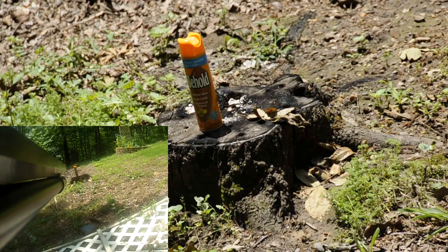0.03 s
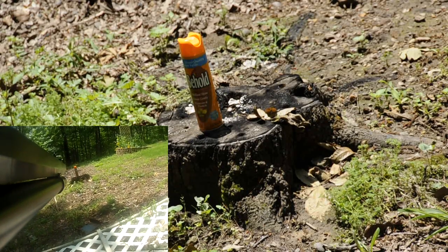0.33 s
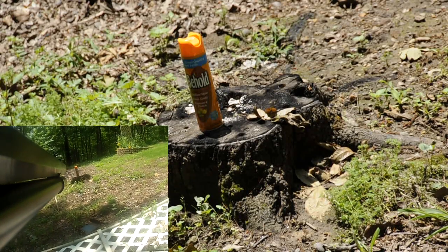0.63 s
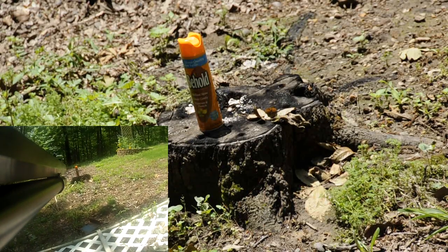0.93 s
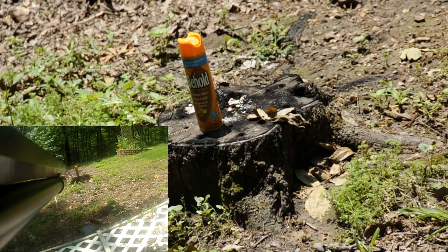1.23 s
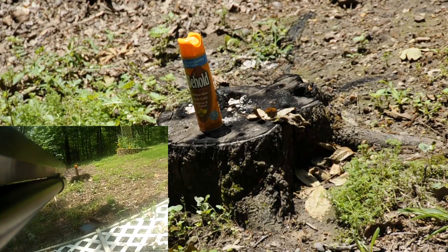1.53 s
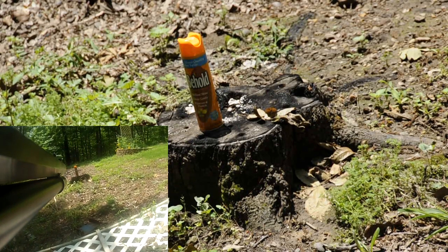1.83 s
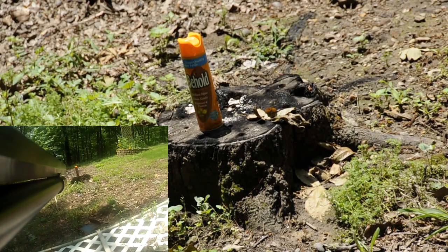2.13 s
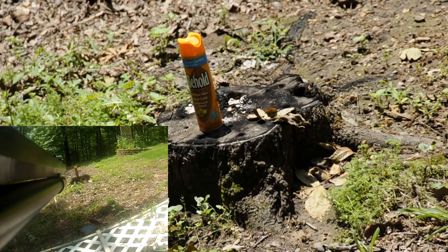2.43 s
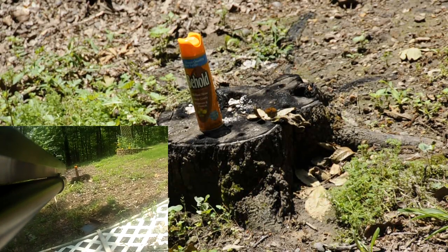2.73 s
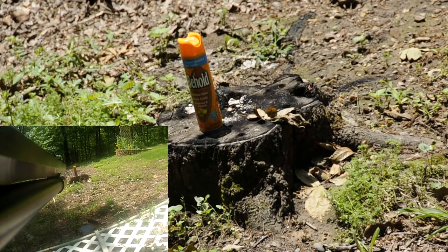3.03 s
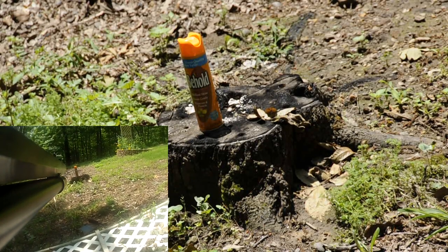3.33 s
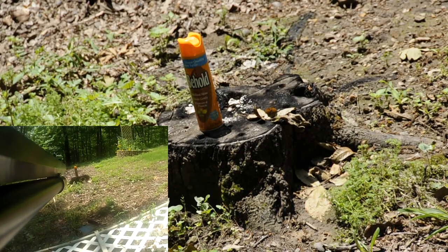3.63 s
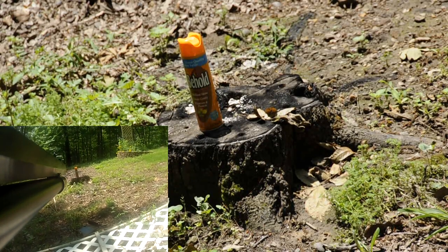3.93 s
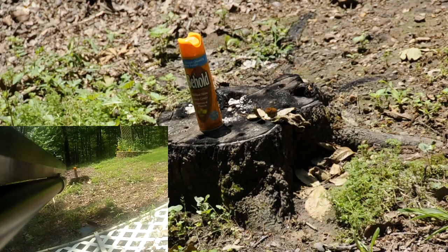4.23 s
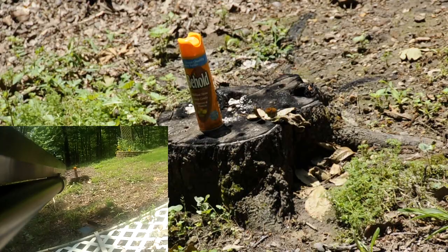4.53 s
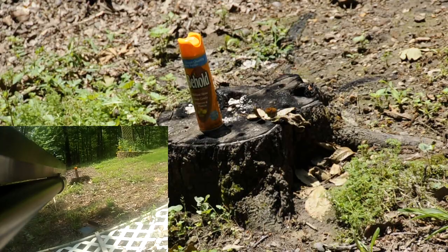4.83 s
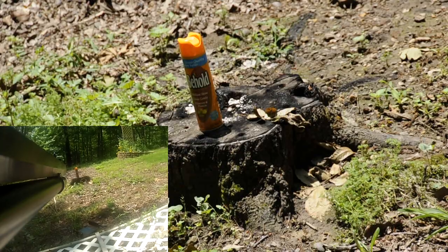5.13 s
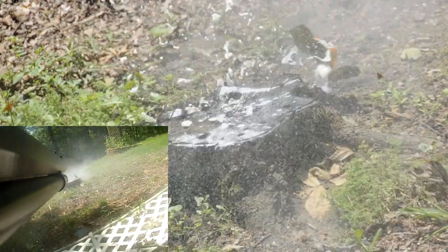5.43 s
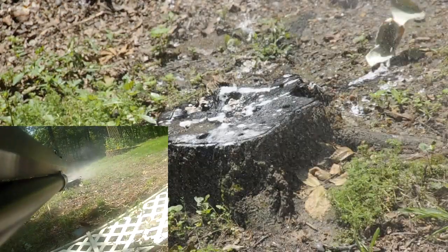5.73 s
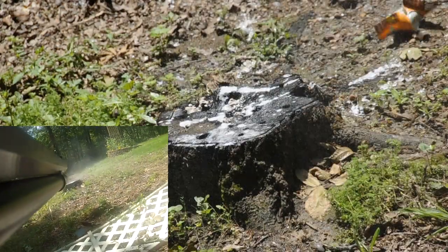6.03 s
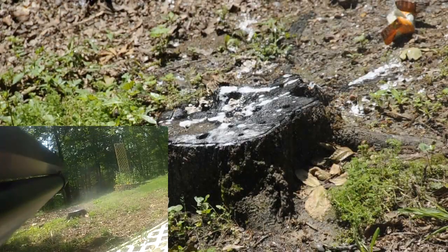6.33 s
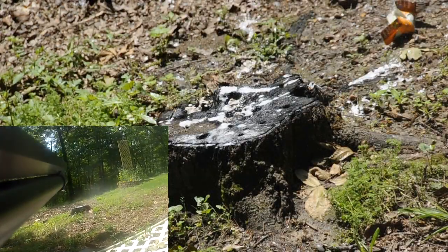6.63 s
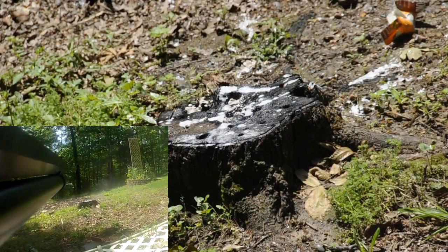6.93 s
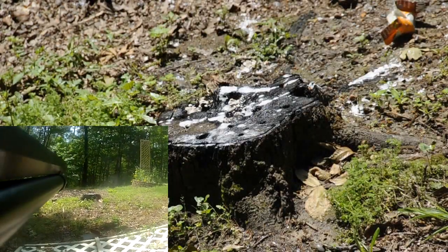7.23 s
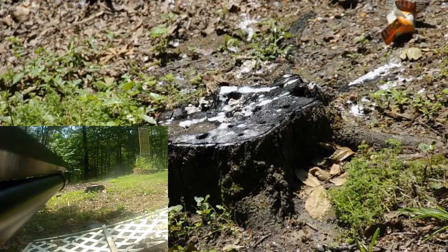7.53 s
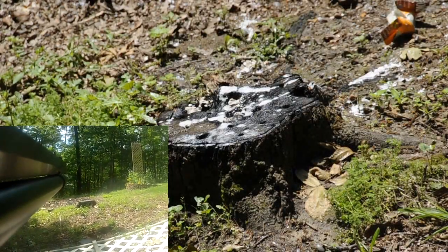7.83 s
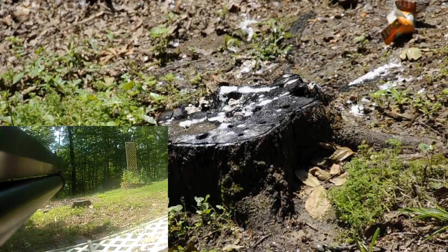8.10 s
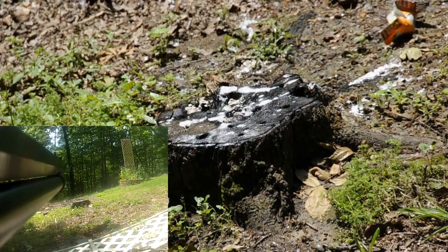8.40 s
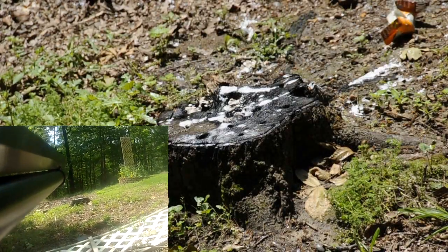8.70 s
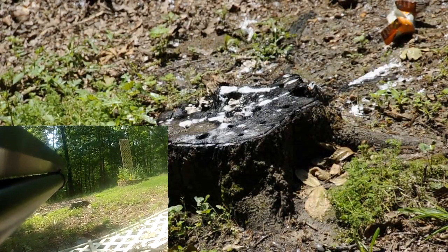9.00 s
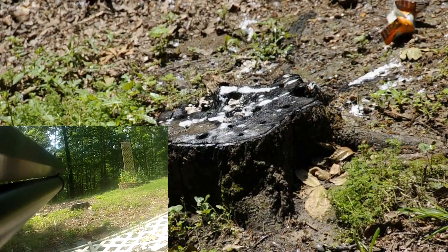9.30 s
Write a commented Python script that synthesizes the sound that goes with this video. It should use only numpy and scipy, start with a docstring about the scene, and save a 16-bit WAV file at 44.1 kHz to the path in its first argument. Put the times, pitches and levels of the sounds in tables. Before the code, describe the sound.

Heard from a small microphone mounted on a rifle, a forest clearing is nearly still, with soft chirps and a thin whine. Suddenly the rifle fires and a spray can bursts in one harsh, distorted blast. The report rolls back from far hills over a light patter of droplets. Close handling follows: bumps, steel clinks, clicks, short scrapes and rustling, with faint bird whistles in the distance.

```python
"""A forest clearing, heard from the microphone of a small camera on a rifle. Birds call over quiet air
and a faint whine. A shot bursts an aerosol can and overloads the camera; the report scatters off the
near trees, then rolls back from far slopes, and droplets patter on dry leaves. Afterwards the rifle is
moved, right at the microphone: metal clinks, and the camera housing is rubbed and knocked."""
import sys
import numpy as np
from scipy import signal
from scipy.fft import rfft, irfft, next_fast_len
from scipy.io import wavfile
from scipy.ndimage import map_coordinates

SR = 44100
rng = np.random.default_rng(int(sys.argv[2]) if len(sys.argv) > 2 else 0)


def to_wav(sig):
    """Store sig (one row per channel, or 1-D mono) as 16-bit WAV at the path in sys.argv[1].

    Samples outside -1..1 are clipped; the rate is SR.
    """
    pcm = np.clip(np.atleast_2d(sig), -1, 1) * 32767
    pcm = np.round(pcm).astype(np.int16)
    wavfile.write(sys.argv[1], SR, pcm.T)  # frames by channels


N = 421596
T = np.arange(N) / SR
HAMMER_S, SHOT_S, STOP_S = 5.299, 5.31, 9.424  # the action snaps, the report arrives, the sound ends
CAMERA_RATE_HZ = 12000

# Spectra at the microphone. Each row: frequency in Hz, relative level in dB.
AIR_COLOUR = [(12, -46), (20, -24), (43, -10), (76, -6.5), (128, 0), (211, -9), (377, -10.5), (889, -21),
              (1270, -14.5), (1590, -22.5), (3010, -24), (5240, -36), (6010, -49), (6910, -36.5),
              (15000, -52.5)]  # the quiet clearing
TREES_COLOUR = [(30, -22), (90, -20.5), (160, -7.5), (260, -0.5), (520, -1), (950, 1), (1500, -1.5),
                (2600, -2.5), (4000, -8), (5100, -19), (5450, -25), (5950, -35.5), (9000, -45),
                (15000, -51.5)]  # the report off the near trees
SLOPES_COLOUR = [(40, -30), (100, -14.5), (200, -4), (300, -1), (520, -7), (750, -6), (1100, -10.5),
                 (2000, -19.5), (3200, -29.5), (4700, -45), (5900, -60.5), (15000, -69.5)]  # the report off the far slopes
PLASTIC_CLACK_COLOUR = [(150, -3), (500, -2.5), (1400, 4), (2600, -1), (3500, -48), (6000, -41),
                        (15000, -32)]  # the body of a contact
BRIGHT_CLICK_COLOUR = [(500, -46), (2500, 2.5), (4000, -1.5), (5000, 1), (6000, -26), (7500, -6),
                       (13000, -9), (15500, -14)]  # its sharp edge
CLOTH_RUSTLE_COLOUR = [(25, -5), (70, -1), (200, -5.5), (400, -1), (800, -14.5), (1500, -13), (2600, -17.5),
                       (4000, -26.5), (6000, -39)]  # cloth pressing on the housing
CLOTH_HISS_COLOUR = [(700, -6), (2000, -2), (4000, 2.5), (5000, 0), (6000, -9), (7800, -5.5), (10000, -7.5),
                     (12000, -18), (15000, -11)]  # cloth sliding over it
STICK_SLIP_COLOUR = [(59, -27), (100, 5), (594, -1.5), (1290, -4.5), (2130, -24), (2630, -17.5),
                     (4940, -26), (5960, -37), (7200, -30), (15000, -27)]  # coarse scrapes
MIRROR_COLOUR = [(6500, -7.5), (7000, -8.5), (8500, -21.5), (10700, -37), (11700, -38.5), (12300, -37),
                 (13300, -39), (15500, -31.5)]  # the mirror image around the camera's sampling rate

# Narrow bands and resonances. Each row: frequency in Hz, width in Hz, relative level in dB.
WHINE_BANDS = [(1258, 47, -62.5), (5040, 70, -82)]  # the faint whine
STEEL_MODES = [(1530, 23, -12), (1780, 100, -4), (1970, 30, 0), (2310, 80, 5), (2400, 75, 4),
               (2790, 110, -4), (3060, 37, 1), (3420, 40, -11), (3750, 85, -3)]  # the rifle's metal parts
HOUSING_MODES = [(3250, 93, 0.5), (4000, 90, 1.5), (5300, 33, -4), (6700, 51, -1), (7900, 270, -10.5),
                 (13800, 72, -17)]  # the camera housing; rubbing() widens the narrow ones

# The nearer bird. Each row: start in seconds, first and last pitch in Hz, level in dB.
NEAR_CHIRPS = [(.29, 3140, 2750, -64), (.355, 2980, 2480, -60), (.395, 2600, 3070, -61),
               (.537, 3400, 2410, -60.5), (1.694, 3110, 2500, -61), (1.85, 2520, 3550, -60),
               (3.328, 2550, 3020, -62)]
# The farther bird. Each row: start in seconds, first pitch in Hz, level in dB.
FAR_WHISTLES = [(7.0, 3516, -56), (7.23, 3640, -56.5), (7.46, 3620, -52.5), (8.12, 3540, -51.5),
                (8.36, 3576, -55), (8.615, 3610, -49), (8.87, 3645, -53)]
# Hand and shoulder on the stock. Each row: start in seconds, level in dB, pitch in Hz.
STOCK_BUMPS = [(.455, -52, 150), (.692, -46, 150), (2.361, -33, 158), (3.928, -43, 139),
               (7.078, -20.5, 166), (7.226, -15.5, 165), (7.2445, -8, 262), (8.693, -35.5, 263),
               (9.193, -30.5, 216)]
# Pressure waves of muzzle and can. Each row: start in seconds, level in dB, push length in seconds.
PRESSURE_WAVES = [(5.3088, 7, 0.00063), (5.322, 12.5, 0.0015), (5.336, 15, 0.0016)]
# One roll from each far slope. Each row: crest in seconds, level in dB.
SLOPE_ROLLS = [(5.8, -21.5), (6.7, -28.5)]
# Showers of droplets. Each row: start in seconds, hold in seconds, level in dB.
DROPLET_SHOWERS = [(5.75, 0.17, -42.5), (7.1, 0.37, -65)]
# Sharp contacts of hand, sling and stock. Each row: start in seconds, clack in dB, click in dB.
HANDLING_TICKS = [(6.9406, -54, -43), (7.107, -48, -55), (7.155, -52, -56), (7.2003, -50, -57),
                  (7.572, -56, -61), (7.824, -49, -51), (7.9244, -41, -47), (8.076, -41, -54),
                  (8.1195, -28, -26.5), (8.145, -31.5, -41), (8.172, -39, -42), (8.2271, -34.5, -41),
                  (8.239, -35.5, -40), (8.4017, -38.5, -49), (8.4162, -38, -50), (8.608, -35, -43),
                  (8.617, -41, -38), (8.653, -36, -52), (8.6594, -36, -33), (8.7425, -44, -52),
                  (9.1186, -44, -47), (9.179, -41.5, -55), (9.4085, -55, -60)]
# The rifle's metal parts meeting. Each row: start in seconds, peak level in dB.
METAL_CLINKS = [(7.6318, -28), (7.6383, -24.5), (7.7932, -29.5), (7.931, -40)]
# Cloth and hand over the housing. Each row: start in seconds, hold in seconds, rustle in dB, hiss in dB.
RUB_STROKES = [(8.048, .04, -44.5, -49), (8.119, 0.067, -42.5, -60), (8.412, 0.011, -48, -62),
               (8.6, 0.13, -48, -75), (8.859, 0.022, -49.5, -58.5), (9.212, 0.032, -40.5, -51),
               (9.233, 0.15, -53, -47.5)]
# Stick-slip scrapes. Each row: start in seconds, length in seconds, level in dB.
SHORT_SCRAPES = [(8.226, 0.014, -32.5), (8.6, 0.027, -25), (8.617, 0.0313, -34)]
# Blows on the housing. Each row: start in seconds, level in dB, pitch in Hz, 60 dB decay in seconds.
HOUSING_KNOCKS = [(7.748, -28, 62, .066), (7.827, -32.5, 70, .06), (8.1195, -2.5, 1250, 0.00091),
                  (8.1194, -18, 328, 0.036), (8.1445, -19.5, 380, 0.016), (8.172, -18, 573, 0.0055),
                  (8.6041, -11, 213, 0.021), (8.617, -16.5, 413, 0.026), (8.66, 5, 730, 0.0014),
                  (8.742, -27, 400, 0.0086), (8.826, -19.5, 369, 0.0073), (9.119, -20, 230, 0.019),
                  (9.2369, -13, 294, 0.013), (9.4089, -16, 194.5, 0.022)]


def undb(db):
    """Decibels to gain."""
    return 10 ** (np.asarray(db) / 20)


def unit(x):
    """Scale to an rms of one."""
    return x / np.sqrt(np.mean(x ** 2) + 1e-30)


def butter(order, hz, kind="low"):
    """Sections of a Butterworth filter."""
    return signal.butter(order, hz, kind, fs=SR, output="sos")


def shape(x, points):
    """Filter by (Hz, dB) points joined on a log-frequency axis."""
    size = next_fast_len(len(x))
    hz = np.arange(size // 2 + 1) * SR / size
    point_hz, point_db = np.transpose(points)
    gain = undb(np.interp(np.log(hz + 1e-3), np.log(point_hz), point_db))
    return irfft(rfft(x, size) * gain, size)[:len(x)]


def colour(x, points):
    """Give a signal a spectrum, at unit rms."""
    return unit(shape(x, points))


def resonate(x, hz, width_hz):
    """One resonance, gain one at its centre."""
    return signal.lfilter(*signal.iirpeak(hz, hz / width_hz, SR), x)


def noise_band(hz, width_hz):
    """Noise passed twice through one resonance, at unit rms."""
    once = resonate(rng.standard_normal(N), hz, width_hz)
    return unit(resonate(once, hz, width_hz))


def walk(per_s):
    """Smooth random wandering with a spread near one."""
    points = rng.standard_normal(int(N / SR * per_s) + 2)
    return np.interp(T * per_s, np.arange(len(points)), points)


def grains(per_s, spread_db):
    """Random impulses of uneven size."""
    impulses = (rng.random(N) < per_s / SR) * rng.standard_normal(N)
    return impulses * undb(spread_db * rng.standard_normal(N))


def add(out, s, x):
    """Mix a short sound in at s seconds."""
    i = int(s * SR)
    out[i:i + len(x)] += x[:len(out) - i]


def fade(t, t60):
    """Exponential decay, 60 dB in t60 seconds."""
    return np.exp(-np.log(1000) * t / t60)


def swell(s, hold_s, rise_s, t60):
    """Gain that rises by 60 dB up to time s, holds, then dies away."""
    return fade(np.maximum(s - T, 0), rise_s) * fade(np.maximum(T - s - hold_s, 0), t60)


def swells(rows, rise_s, t60):
    """Joint gain of overlapping swells. Each row: start in seconds, hold in seconds, level in dB."""
    return np.sqrt(sum((undb(db) * swell(s, hold_s, rise_s, t60)) ** 2 for s, hold_s, db in rows))


def clearing_air():
    """Quiet air all around; its low rumble wavers and swells once."""
    crest_s, width_s, rise_db = 2.2, .6, 3
    air = colour(rng.standard_normal(N), AIR_COLOUR)
    low = signal.sosfiltfilt(butter(2, 450), air)
    surge = undb(rise_db * np.exp(-((T - crest_s) / width_s) ** 2) - .7)
    rumble = low * surge * undb(1.3 * walk(6.6))
    murmur = noise_band(330, width_hz=130) * surge * undb(4 * walk(5.5))
    return undb(-56) * (air - low + rumble) + undb(-71) * murmur


def whine():
    """Two faint tones of unsteady pitch, each in a narrow haze of noise."""
    out = np.zeros(N)
    for hz, width, db in WHINE_BANDS:
        pitch = hz + .45 * width * walk(130)
        tone = unit(np.sin(2 * np.pi * np.cumsum(pitch) / SR))
        out += undb(db - 2.5) * (tone + .76 * noise_band(hz, 2 * width))
    return out


def sing(notes, rough, echo_db):
    """Wavering notes smeared by the trees. Each row: start in seconds, pitch track in Hz, level in dB."""
    out, waver = np.zeros(N), walk(120)
    for s, pitch, db in notes:
        hz = pitch * (1 + rough * waver[int(s * SR):][:len(pitch)])
        envelope = np.sqrt(signal.windows.cosine(len(hz)))
        add(out, s, undb(db) * envelope * np.sin(2 * np.pi * np.cumsum(hz) / SR))
    trees = rng.standard_normal(SR) * fade(T[:SR], t60=.9)
    echo = signal.fftconvolve(out, trees / np.linalg.norm(trees))[:N]
    return (out + undb(echo_db) * echo) / np.hypot(1, undb(echo_db))


def birds():
    """A nearer bird sweeps its chirps at one speed; a farther one's whistles sag ever faster."""
    sweep_hz_per_s, whistle_s, sag_hz = 14000, .2, 447
    chirps = [(s, np.linspace(first, last, int(abs(last - first) / sweep_hz_per_s * SR)), db)
              for s, first, last, db in NEAR_CHIRPS]
    sag = sag_hz * np.linspace(0, 1, int(whistle_s * SR)) ** 1.6
    whistles = [(s, first - sag, db) for s, first, db in FAR_WHISTLES]
    return sing(chirps, rough=.006, echo_db=-5) + sing(whistles, rough=.012, echo_db=0)


def swing(hz, t60, rise_s, low_cut_hz):
    """The damped housing swings for a few cycles, with no lasting push; peak of one."""
    t = T[:SR // 5]
    motion = np.sin(2 * np.pi * hz * t) * fade(t, t60) * (1 - np.exp(-t / rise_s))
    motion = signal.sosfilt(butter(1, low_cut_hz, "high"), motion)
    return motion / np.abs(motion).max()


def bumps():
    """Padded contacts on the stock reach the microphone as dull thuds."""
    out = np.zeros(N)
    for s, db, hz in STOCK_BUMPS:
        add(out, s, undb(db) * swing(hz, t60=.059, rise_s=.001, low_cut_hz=.72 * hz))
    return signal.sosfilt(butter(2, 80, "high"), out)


def scatter(gain, points, middle_s, loss_db, patchy_db):
    """Countless echoes merge into noise; the air takes loss_db per kHz and second, up to 4 kHz."""
    echoes = colour(rng.standard_normal(N), points)
    age_s = np.clip(T, SHOT_S, 8) - middle_s  # brighter before middle_s, duller after
    out, below = 0, 0
    for khz in (.4, .8, 1.6, 2.8):
        low = signal.sosfiltfilt(butter(2, khz * 1000 * np.sqrt(2)), echoes)
        out += (low - below) * undb(-loss_db * age_s * khz)
        below = low
    out += (echoes - below) * undb(-loss_db * age_s * 4)
    return out * gain * undb(patchy_db * walk(45))


def shot():
    """The action snaps at the microphone, pressure waves arrive, and the forest answers near and far."""
    direct, t = np.zeros(N), T[:SR // 10]
    action = signal.sosfilt(butter(8, [700, 4700], "band"), rng.standard_normal(len(t)))
    add(direct, HAMMER_S, undb(-34) * unit(action[:SR // 50]))
    for s, db, push_s in PRESSURE_WAVES:
        add(direct, s, undb(db) * (1 - t / push_s) * np.exp(-t / push_s))  # a sharp push, then suction
    trees = undb(4) * swell(SHOT_S, hold_s=.18, rise_s=.006, t60=1.13)
    slopes = swells([(s, 0, db) for s, db in SLOPE_ROLLS], rise_s=3.1, t60=4.6) * (T > SHOT_S)
    near = scatter(trees, TREES_COLOUR, middle_s=5.51, loss_db=3.5, patchy_db=.9)
    far = scatter(slopes, SLOPES_COLOUR, middle_s=6.61, loss_db=5.5, patchy_db=.6)
    return direct + near + far


def overload(x):
    """The report overdrives the coarse converter; its harmonics fold back down as a harsh bite."""
    ceiling = undb(1.1)
    moments = np.arange(0, N / SR + .01, 1 / CAMERA_RATE_HZ)
    samples = map_coordinates(x, [moments * SR], order=3)
    distortion = np.clip(samples, -ceiling, ceiling) - samples
    return x + signal.resample_poly(distortion, SR, CAMERA_RATE_HZ, window=("kaiser", 3))[:N]


def patter():
    """A fine spray of droplets comes down on dry leaves."""
    leaves = [(1500, -22.5), (4000, 4.5), (6000, -14.5), (9000, -11.5), (15000, -16)]
    drops = colour(grains(5000, spread_db=4.5), leaves)
    return drops * swells(DROPLET_SHOWERS, rise_s=.6, t60=1.4)


def contact(points, t60):
    """A dry burst that dies at once; unit rms over its first 5 ms."""
    t = T[:SR // 5]
    burst = colour(rng.standard_normal(len(t)), points) * fade(t, t60)
    return burst / np.sqrt(np.mean(burst[:SR // 200] ** 2))


def ticks():
    """Light contacts close by: a plastic clack under a shorter click; fainter ones fall at random."""
    handling_s, length_s, stray_count, stray_db = 7.0, 2.4, 26, -60.5
    out = np.zeros(N)
    strays = [(handling_s + length_s * when, stray_db + 4 * clack, stray_db + 4 * click)
              for when, clack, click in rng.random((stray_count, 3))]
    for s, clack_db, click_db in HANDLING_TICKS + strays:
        add(out, s, undb(clack_db) * contact(PLASTIC_CLACK_COLOUR, t60=.014))
        add(out, s, undb(click_db) * contact(BRIGHT_CLICK_COLOUR, t60=.0064))
    return out


def clinks():
    """Steel parts near the microphone meet with a crack and ring briefly."""
    out, t = np.zeros(N), T[:SR // 3]
    clink_colour = [(800, -28), (1700, 5), (4400, 1), (5600, -32), (15000, -35)]
    for s, db in METAL_CLINKS:
        push = rng.standard_normal(len(t)) * (fade(t, .011) + undb(-17.5) * fade(t, .46))
        ring = sum(undb(mode_db) * resonate(push, hz, width) for hz, width, mode_db in STEEL_MODES)
        clink = shape(ring + undb(1) * push, clink_colour)
        add(out, s, undb(db) * clink / np.abs(clink).max())
    return out


def rubbing():
    """Fine slips of cloth rustle, hiss and ring the housing around the microphone."""
    pressure = swells([(s, hold, db) for s, hold, db, _ in RUB_STROKES], rise_s=.28, t60=.33)
    sliding = swells([(s, hold, db) for s, hold, _, db in RUB_STROKES], rise_s=.28, t60=.33)
    grip = swell(7.7, hold_s=1.9, rise_s=.5, t60=.5)  # the hand never rests fully
    rustle = colour(grains(2500, spread_db=0), CLOTH_RUSTLE_COLOUR) * (pressure + undb(-57.5) * grip)
    fibres = rng.standard_normal(N)
    ring = unit(sum(undb(db) * resonate(fibres, hz, max(width, 150)) for hz, width, db in HOUSING_MODES))
    friction = colour(rng.standard_normal(N), CLOTH_HISS_COLOUR)
    hiss = (undb(-3) * friction + undb(-7) * ring) * (sliding + undb(-68) * grip)
    return (rustle + hiss) * undb(2 * walk(48))


def knocks():
    """Each blow swings the housing; a harder contact is higher and has more tick against its thud."""
    tick_t60, rise_cycles, tick_db_per_octave = .0041, .089, 4.5
    out = np.zeros(N)
    for s, db, hz, t60 in HOUSING_KNOCKS:
        thud = swing(hz, t60, rise_s=rise_cycles / hz, low_cut_hz=.37 * hz)
        tick = contact(BRIGHT_CLICK_COLOUR, tick_t60) + contact(PLASTIC_CLACK_COLOUR, tick_t60)
        tick_db = -4 + tick_db_per_octave * np.log2(hz / 1000)
        add(out, s, undb(db) * (thud + undb(tick_db) * tick / np.abs(tick).max()))
    return out


def scrapes():
    """Coarse sticking and slipping on the housing, in short bursts."""
    out = np.zeros(N)
    slips = colour(grains(2500, spread_db=1.5), STICK_SLIP_COLOUR)
    for s, length, db in SHORT_SCRAPES:
        piece = slips[int(s * SR):int((s + length) * SR)]
        add(out, s, undb(db) * unit(piece) * signal.windows.tukey(len(piece), .3))
    return out


def scene():
    """The clearing in mono, from the camera on the rifle."""
    handling = bumps() + knocks() + ticks() + clinks() + rubbing() + scrapes()
    return (overload(shot()) + patter() + handling + birds() + clearing_air() + whine())[None]


def record(dry):
    """The camera's coarse sampling mirrors the sound as a thin sizzle; it saturates and cuts the top."""
    knee, stop_fade_s, top_hz = 6, .0021, 15700
    baseband = signal.sosfilt(butter(10, CAMERA_RATE_HZ * .46), dry[0])
    sizzle = shape(baseband * 2 * np.cos(2 * np.pi * CAMERA_RATE_HZ * T), MIRROR_COLOUR)
    mix = dry[0] + sizzle
    saturated = mix / (1 + np.abs(mix) ** knee) ** (1 / knee)
    running = np.clip((STOP_S - T) / stop_fade_s, 0, 1)
    top_cut = signal.ellip(10, .1, 60, top_hz, fs=SR, output="sos")
    return signal.sosfilt(top_cut, saturated * running)[None]


dry = scene()
out = record(dry)
to_wav(out)
```